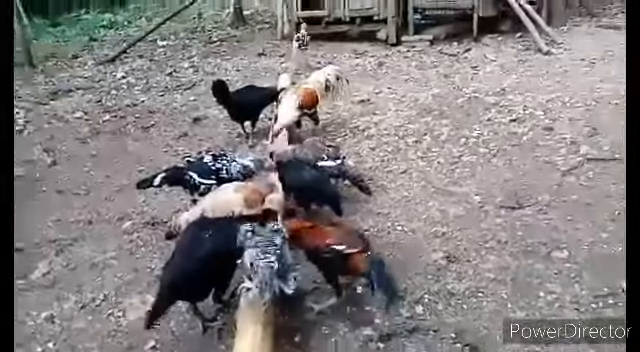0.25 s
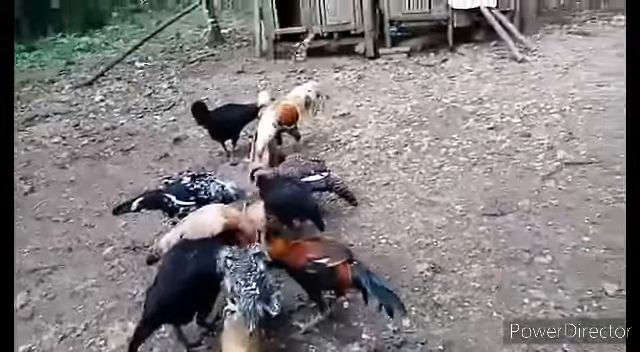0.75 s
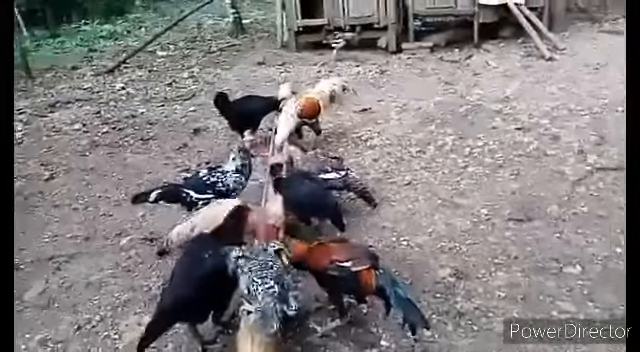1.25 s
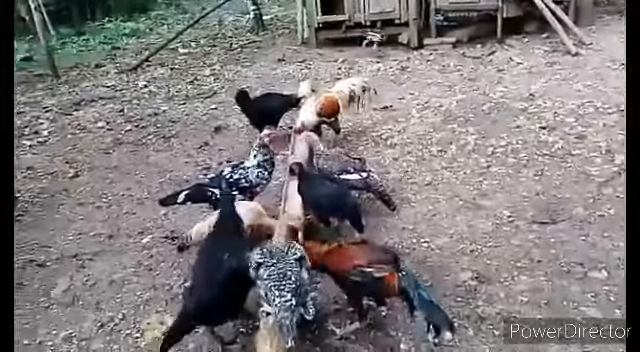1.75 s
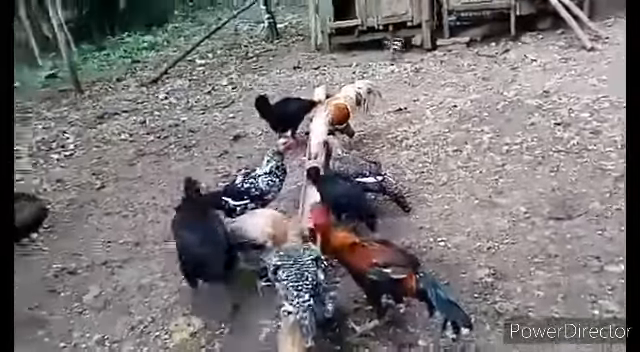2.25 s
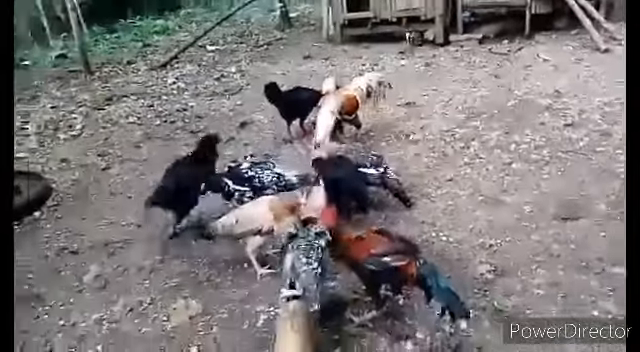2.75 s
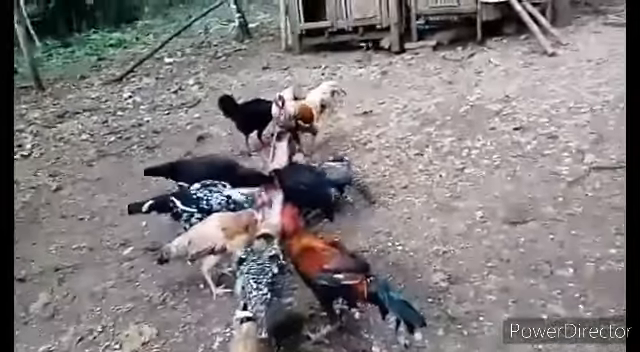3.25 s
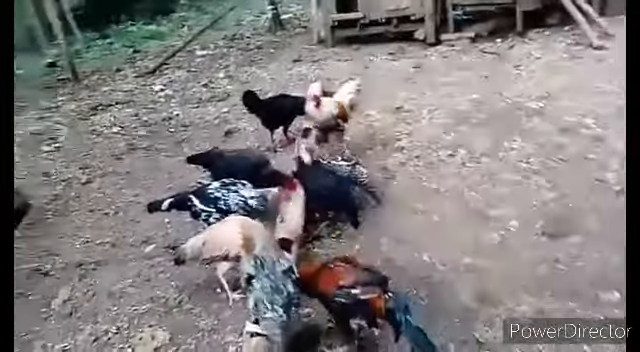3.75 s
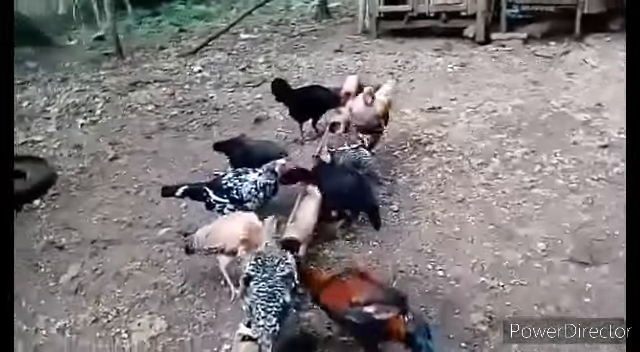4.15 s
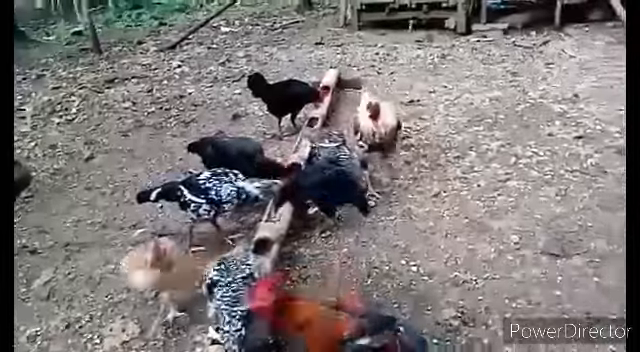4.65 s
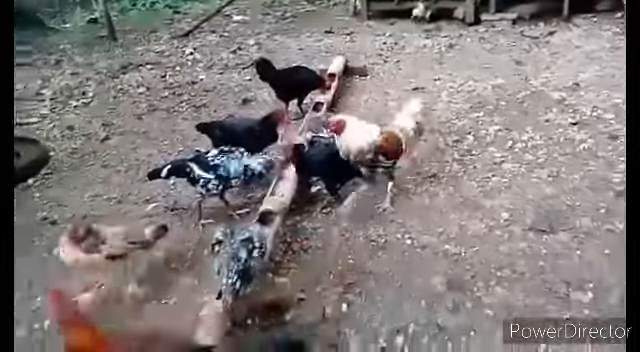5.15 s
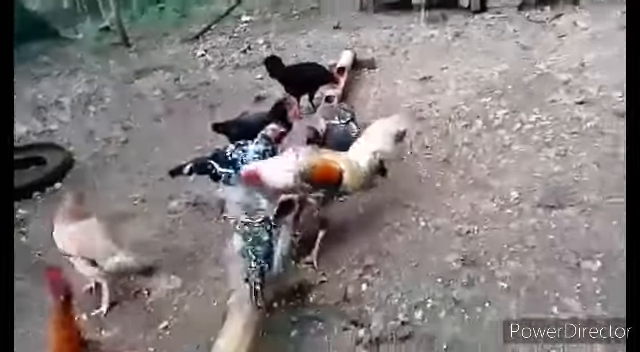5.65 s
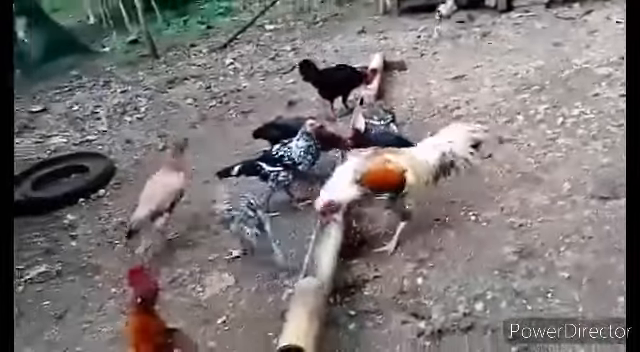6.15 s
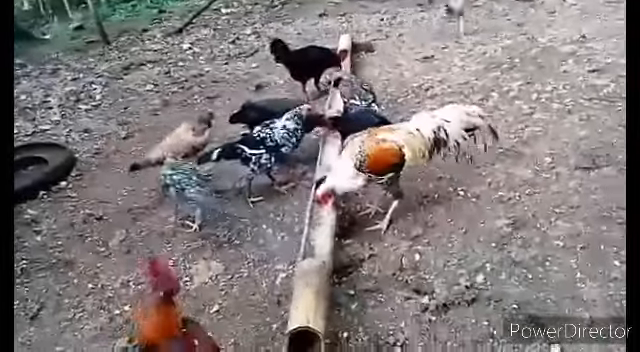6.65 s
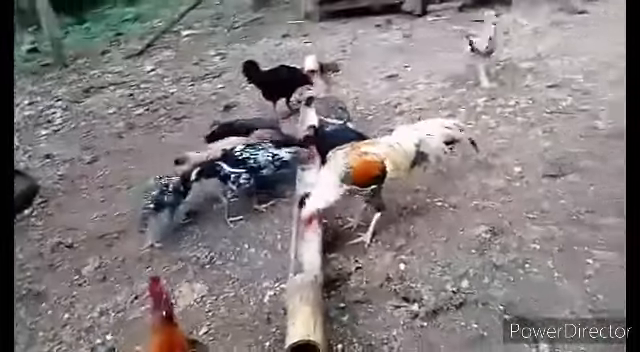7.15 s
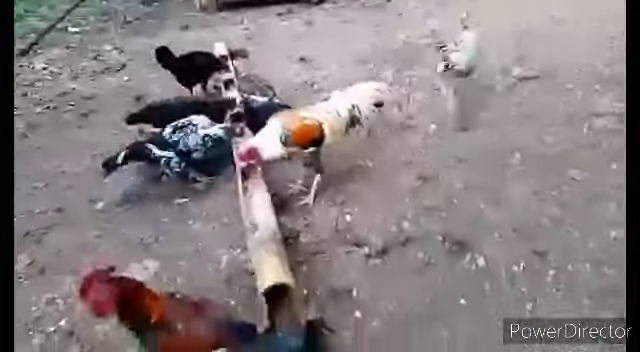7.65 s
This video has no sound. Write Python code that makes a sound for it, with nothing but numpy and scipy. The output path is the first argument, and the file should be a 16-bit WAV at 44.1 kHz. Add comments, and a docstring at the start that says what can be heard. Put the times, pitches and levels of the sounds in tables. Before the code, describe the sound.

Dry, hollow beak taps on bamboo and scattering grain in a dirt yard, soft clucks, gritty footsteps, brief squawks, and a faint distant engine hum.

```python
"""Hens peck grain from a split bamboo trough: beaks ring the bamboo's modes and scatter noisy grain.
A few birds squawk (pulses and puffs through a throat) or cluck softly (gliding notes); claws rake grain.
The place is a dirt yard: feet shuffle in grit, air and leaves wash, and far off an engine hums (noise
through low resonances) and an insect buzzes (pulsed noise through a high one).
The microphone is a hand-held phone with two ports; fingers knock the right one with dull thuds."""
import sys
import numpy as np
from scipy import signal
from scipy.fft import rfft, irfft, next_fast_len
from scipy.io import wavfile
from scipy.ndimage import uniform_filter1d

SR = 44100
rng = np.random.default_rng(int(sys.argv[2]) if len(sys.argv) > 2 else 0)


def output_pcm(signal):
    """Save a mono or channel-first signal as 16-bit PCM at the path in sys.argv[1].

    Samples are clipped to [-1, 1] before scaling.
    """
    pcm = np.clip(np.atleast_2d(signal).T, -1, 1) * 32767
    wavfile.write(sys.argv[1], SR, np.round(pcm).astype(np.int16))


def volts(x):
    """Linear amplitude factor 10**(x/20) for a level x in dB, scalar or array-like."""
    e = np.asarray(x, float) / 20
    return 10 ** e


N = 347949  # samples
# Levels of the sources are those ahead of the port gains and the filters that follow.


def evened(x):
    """Scales to rms 1."""
    return x / np.sqrt(np.mean(x ** 2) + 1e-20)


def read(points, hz):
    """Reads a spectrum on a log-frequency axis."""
    f, value = np.transpose(points)
    return np.interp(np.log(hz + 1), np.log(f + 1), value)


def coloured(x, gain):
    """Filters by a gain given as a function of Hz."""
    size = next_fast_len(len(x) + 512)
    return irfft(rfft(x, size) * gain(np.fft.rfftfreq(size, 1 / SR)), size)[:len(x)]


def add(mix, s, sound):
    """Mixes a sound in at time s."""
    part = mix[..., round(s * SR):][..., :sound.shape[-1]]
    part += sound[..., :part.shape[-1]]


def track(rows, sound):
    """Plays one sound per row, at the time that opens the row."""
    mix = np.zeros(N)
    for s, *row in rows:
        add(mix, s, sound(*row))
    return mix


def resonate(x, hz, width):
    """One resonance of gain 1 that may move."""
    turn = np.exp(2j * np.pi * np.cumsum(hz * np.ones(len(x))) / SR)
    r = np.exp(-np.pi * width / SR)
    return 2 * (turn * signal.lfilter([1 - r], [1, -r], x / turn)).real


def wander(per_s):
    """Slow chance of rms 1, whose swings fall off above per_s hertz."""
    return evened(coloured(rng.standard_normal(N), lambda hz: 1 / (1 + (hz / per_s) ** 2)))


def patchy(x, patchy_db):
    """Lets patches of the spectrum swell and fade at random."""
    z = signal.stft(x, nperseg=512, noverlap=384)[2]
    chance = rng.standard_normal(z.T.shape)
    patches = evened(uniform_filter1d(uniform_filter1d(chance, 16, 0), 8, 1)).T
    return signal.istft(z * volts(patchy_db * patches), nperseg=512, noverlap=384)[1][:N]


def insect():
    """Far insect: wing-beat bursts of noise into a high resonance."""
    hz, beats_per_s, mean_db = 11293, 200, -80
    beat = 0.52 + np.exp(2.0 * (np.cos(2 * np.pi * beats_per_s * np.arange(N) / SR) - 1))
    buzz = resonate(resonate(beat * rng.standard_normal(N), hz, 300), hz, 400)
    return volts(mean_db + 2.2 * wander(6.4)) * evened(buzz)


# Engine orders and rumble: (centre [Hz], width of the first resonance [Hz], level before the swells [dB])
ENGINE_ORDERS = [(122.33, 3, -67), (155, 10.8, -68), (184, 3.1, -72.5), (136.5, 111, -66.5),
                 (69, 17, -81.5)]
# Swells of the engine as the air carries it: (time [s], gain [dB])
ENGINE_SWELLS = [(0, -3.5), (1.2, -3), (2.2, -6.5), (3.7, -7), (5, -3), (5.9, -10), (6.4, -7), (6.8, -9),
                 (7.89, -8)]


def engine():
    """Distant engine: noise through narrow low resonances, its level wavering."""
    orders = (volts(db) * evened(resonate(resonate(rng.standard_normal(N), hz, w), hz, 2 * w))
              for hz, w, db in ENGINE_ORDERS)
    swell_db = np.interp(np.arange(N) / SR, *np.transpose(ENGINE_SWELLS))
    return sum(orders) * volts(swell_db + 2.4 * wander(8))


# Colour of the yard's air: (frequency [Hz], relative gain [dB])
YARD_COLOUR = [(180, -65), (300, -34), (435, -12), (863, -16), (2970, -1), (5710, -8), (7030, -19.5),
               (8280, -6.5), (10000, -30.5), (10500, 1.5), (12300, -41), (22000, -120)]


def yard():
    """Far wash of air and leaves: coloured noise with a patchy spectrum."""
    wash = coloured(rng.standard_normal(N), lambda f: volts(read(YARD_COLOUR, f)))
    return volts(-71.5) * evened(patchy(wash, 2.5))


# Colour of grit underfoot: (frequency [Hz], relative gain [dB])
GRIT_COLOUR = [(300, -6), (600, -0.5), (900, -0.5), (1400, -1.5), (3000, -1), (4600, -13), (5700, -6),
               (7000, -25.5), (9000, -16.5), (12500, -38)]
# How busy the flock is: (time [s], rustle level [dB])
FLOCK_BUSTLE = [(0, -64), (.5, -65), (1.03, -70.5), (1.14, -65.5), (1.3, -64), (1.75, -68.5), (2.2, -64.5),
                (2.85, -63.5), (3.4, -65), (4.35, -66.5), (5.1, -63.5), (5.3, -67.5), (5.72, -56),
                (6.1, -69), (6.7, -66), (6.8, -77.5), (6.95, -61.5), (7.3, -68.5), (7.89, -62.5)]
# Footfalls: (middle [s], length [s], low scuff level [dB], level of grit kicked up [dB])
FOOTFALLS = [(.0, 0.097, -73, -59), (0.282, 0.15, -64.5, -73), (0.781, 0.15, -62.5, -75),
             (0.958, 0.076, -55.5, -58), (1.358, 0.19, -67, -76), (2.04, 0.14, -69.5, -61.5),
             (2.343, 0.12, -60, -57.5), (2.484, 0.13, -64, -60), (2.673, 0.3, -65, -70),
             (3.426, 0.12, -65.5, -59.5), (4.773, 0.11, -59, -67), (5, 0.078, -55, -65),
             (5.142, 0.23, -64.5, -68), (6.12, 0.16, -67, -90), (6.378, 0.78, -69, -87),
             (7.04, 0.12, -73, -65.5), (7.63, 0.41, -68.5, -73)]


def shuffle():
    """Clumped grains of grit over a rustle, and lumpy low scuffs of feet."""
    time = np.arange(N) / SR
    t = np.arange(0, N + 64, 64) / SR
    s, length, scuff_db, kick_db = np.transpose(FOOTFALLS)[:, :, None]
    falls = np.exp(-(3 * (t - s) / length) ** 2)  # each footfall swells and fades
    kicked, scuffed = (np.interp(time, t, (volts(db) * falls).sum(0)) for db in (kick_db, scuff_db))
    rustle = np.hypot(volts(np.interp(time, *np.transpose(FLOCK_BUSTLE))), kicked)
    clumps, lumps = volts(3.5 * wander(35)), volts(5.5 * wander(25))
    grains = volts(1.7 * np.minimum(rng.exponential(1, N), 4))
    grains = grains * (rng.random(N) < 2500 / SR) * rng.choice([-1, 1], N)  # about 2500 a second
    grit = evened(grains) * clumps + 0.81 * rng.standard_normal(N)
    grit = coloured(grit, lambda f: volts(read(GRIT_COLOUR, f)))
    scuff = resonate(resonate(rng.standard_normal(N) * lumps, 260, 380), 460, 570)
    return evened(patchy(grit, patchy_db=4.5)) * rustle + evened(scuff) * scuffed


# How alike the diffuse sound is at the two ports: (frequency [Hz], likeness [0-1])
PORT_LIKENESS = [(100, .75), (300, .65), (1000, .85), (2500, .7), (5000, .5), (9000, .2)]


def surroundings():
    """Diffuse sound, only partly alike at the two ports."""
    right, other = (shuffle() + yard() + engine() + insect() for port in "rl")
    like = lambda f: read(PORT_LIKENESS, f)
    left = coloured(right, like) + coloured(other, lambda f: np.sqrt(1 - like(f) ** 2))
    return np.array([left, right])


def knock(db, hz, tick_db, case_hz=3700):
    """A dull thud whose pitch sags to hz, led by a tick of the phone case."""
    t = np.arange(round(.06 * SR)) / SR
    softer = volts(-0.38 * db)  # below 0 dB a knock rises and dies slower
    t60, rise = 0.005 * softer, 0.00017 * softer  # seconds
    thud = -np.cos(2 * np.pi * hz * (t + 0.00055 * (1 - np.exp(-t / 0.00055)))) * volts(-60 * t / t60)
    slump = 0.13 * np.sin(2 * np.pi * 60 * t + np.pi) * volts(-60 * t / 0.018)  # the membrane settles
    tick = -np.cos(2 * np.pi * case_hz * (t - .00025)) * volts(tick_db - 60 * abs(t - .00025) / 0.001)
    return volts(db) * (thud + slump + tick) * (1 - np.exp(-(t / rise) ** 2))


# Finger knocks on the right port: (time [s], level [dB], thud pitch [Hz], tick against thud [dB])
PORT_KNOCKS = [(.788, -47, 467, -20), (.822, -47, 260, -25), (1.0127, -24.5, 155, -12),
               (1.215, -22, 380, -40), (1.315, -49, 525, -15), (1.69, -7.5, 308, 0),
               (2.565, -43.5, 316, -10), (4.599, -44, 245, -10), (5.751, -45, 190, -6),
               (6.071, -45.5, 294, -22), (6.361, -43, 328, -15), (7.448, -42.5, 303, -14)]


def knocking():
    """Fingers of the hand that holds the phone, right on the microphone: one thud per row."""
    return track(PORT_KNOCKS, knock)


def scrape(length, db, hz, width):
    """A burst of grainy rustle in one broad band."""
    count = round(length * SR)
    clusters = evened(uniform_filter1d(rng.standard_normal(count), 70))
    grains = rng.standard_normal(count) * volts(3 * clusters)
    rustle = evened(resonate(resonate(grains, hz, width), hz, width))
    return volts(db) * rustle * np.sin(np.pi * np.linspace(0, 1, count) ** .5)


# Claw scrapes: (time [s], length [s], level before the fades [dB], centre [Hz], width of each resonance [Hz])
CLAW_SCRAPES = [(0.99, 0.13, -56.5, 2520, 1770), (2.698, 0.076, -58.5, 4960, 6000),
                (2.70, 0.091, -56.5, 1370, 1310), (5.051, 0.2, -64.5, 3000, 3000),
                (7.636, 0.06, -61, 1850, 2400)]


def scraping():
    """Claws rake loose grain: one rustling burst per row."""
    return track(CLAW_SCRAPES, scrape)


def cluck(length, db, from_hz, to_hz):
    """A muffled, husky gliding note with a weak overtone."""
    u = np.linspace(0, 1, round(length * SR))
    waver, husk = uniform_filter1d(rng.standard_normal((2, len(u))), 150) * np.sqrt(150)
    turns = np.cumsum((from_hz + (to_hz - from_hz) * u) * (1 + .022 * waver)) / SR
    note = np.sin(2 * np.pi * turns) + .14 * np.sin(4 * np.pi * turns)
    return volts(db) * note * (1 + .35 * husk) * np.sqrt(abs(np.sin(np.pi * u)))


# Soft clucks and chirps: (time [s], length [s], level [dB], start pitch [Hz], end pitch [Hz])
SOFT_CLUCKS = [(0.874, 0.058, -70, 1840, 1800), (1.378, 0.075, -61, 1082, 1080),
               (1.791, 0.052, -62, 475, 512), (2.006, 0.043, -63, 564, 613), (2.461, 0.044, -62, 557, 500),
               (3.072, 0.039, -60, 593, 550), (3.207, 0.13, -70, 690, 720), (3.355, 0.051, -59, 426, 494),
               (3.523, 0.033, -61, 473, 576), (3.648, 0.032, -61, 551, 472), (3.789, 0.052, -57, 279, 456),
               (4.308, 0.032, -63.5, 530, 510), (4.961, 0.038, -58.5, 398, 435),
               (5.324, 0.04, -58, 1575, 1550), (6.059, 0.053, -69, 720, 760),
               (7.668, 0.04, -46, 1274, 1607), (7.673, 0.048, -46.5, 1172, 1023)]


def clucking():
    """Birds murmur with near-closed voices: one gliding note per row."""
    return track(SOFT_CLUCKS, cluck)


# Throat resonances: (centre before the beak moves it [Hz], width of the first pass [Hz],
# level at full effort [dB], gain per dB that effort falls [dB])
THROAT_MODES = [(620, 250, -25, .3), (1230, 380, -1, .2), (1900, 330, 1, -.5), (2410, 350, -11, .8),
                (3080, 300, 2, -.6), (3750, 350, -9, 0), (4800, 1600, -17, -1.5)]


def squawk(rows, loss_db, small):
    """Jittered, uneven pulses and puffs of noise through a throat that moves with the beak."""
    s, *columns = np.transpose(rows)
    t = np.arange(s[0], s[-1], 1 / SR)
    effort_db, hz = (np.interp(t, s, c) for c in columns)
    slack_db = -26 - effort_db  # dB below full effort
    rough = np.clip(.19 + .01 * slack_db, 0, 1)  # the voice frays as effort falls
    beak = small * np.maximum(1.025 - .0035 * slack_db, .8)  # opens with effort, scaling the throat's pitch
    eased_db = np.clip(slack_db, 0, 14)
    jitter = .28 * uniform_filter1d(rng.standard_normal(len(t)), 250)
    turns = np.cumsum(hz * (1 + jitter)) / SR
    pulse_chance = rng.standard_normal(int(turns[-1]) + 2)[np.round(turns).astype(int)]
    uneven = volts(5 * rough * pulse_chance)
    uneven *= 1 + .2 * np.cos(np.pi * turns)  # every other pulse is weaker
    folds = uneven * sum(np.cos(2 * np.pi * k * turns + k * k / 2) for k in range(1, 12))
    bright_noise = np.diff(rng.standard_normal(len(t) + 1))
    puffs = (0.053 + np.exp(-(turns % 1) / 0.051)) * bright_noise
    drive = (1 - rough) * evened(folds) + 2.8 * rough * evened(puffs)
    # each resonance stutters by itself
    breaks_db = 4 * evened(uniform_filter1d(rng.standard_normal((len(THROAT_MODES), len(t))), 350))
    voice = np.zeros(len(t))
    for k, (f, w, db, per_db) in enumerate(THROAT_MODES):
        mode = resonate(resonate(drive, f * beak, w), f * beak, 2 * w)
        voice += (-1) ** k * volts(db + per_db * eased_db + breaks_db[k]) * mode
    # the windpipe passes little bass or treble
    voice = coloured(voice, lambda f: 1 / (1 + (f / 6800) ** 6) / (1 + (480 / (f + 1)) ** 6))
    even = voice / np.sqrt(uniform_filter1d(voice ** 2, 500) + 1e-9)
    return s[0], volts(effort_db + loss_db) * even * signal.windows.tukey(len(t), .08)


# One list a squawk, each of rows (time [s], effort as level before distance [dB], pitch before jitter [Hz])
SQUAWK_CURVES = [
    [(5.553, -54, 450), (5.568, -39, 570), (5.59, -35.5, 622), (5.62, -28, 626), (5.63, -32, 625),
     (5.639, -28, 630), (5.67, -38, 590), (5.695, -53, 490), (5.73, -61, 485)],
    [(5.832, -51, 415), (5.85, -40, 545), (5.868, -34, 600), (5.896, -40, 645), (5.915, -43, 550),
     (5.935, -68, 490)],
    [(7.77, -40, 1040), (7.82, -27, 1058), (7.889, -25, 1062)],
]
# The bird of each squawk: (loss with distance [dB], throat pitch [factor]); the last is a far, small bird
SQUAWK_BIRDS = [(-1, 1.0), (-1, 0.97), (-30, 1.54)]


def squawking():
    """Birds cry out, each voice lowered by its distance."""
    birds = np.zeros(N)
    for rows, bird in zip(SQUAWK_CURVES, SQUAWK_BIRDS):
        add(birds, *squawk(rows, *bird))
    return birds


# Bamboo modes: (frequency before detuning [Hz], relative level [dB], 60 dB decay before damping by grain [s])
BAMBOO_MODES = [(790, -5, .022), (940, -1, .023), (1060, -1, .022), (1400, -2, .02), (1620, -2, .018),
                (1900, -1, .022), (2150, -3, .018), (2450, -2, .018), (2800, -2, .018), (3300, -2, .018),
                (3720, -2, .018), (4250, -4, .015), (4750, -4, .015), (5300, -8, .012), (6100, -14, .01),
                (7600, -23, .01), (9200, -29, .008)]
# Colour of the crack and the scattered grain: (frequency [Hz], relative gain [dB])
GRAIN_COLOUR = [(450, -1.5), (800, 1.5), (1100, -3.5), (3200, 0.5), (5000, -6), (7000, -20), (9000, -24.5),
                (12500, -45)]


def peck(db, spot_hz, sharp_db, grain_db):
    """A beak cracks on the wall and rings the modes near its spot; grain rattles after it."""
    t = np.arange(round(.14 * SR)) / SR
    hz, mode_db, ring = np.transpose(BAMBOO_MODES)[:, :, None]
    chance = rng.standard_normal((3, len(BAMBOO_MODES), 1))  # for level, tuning and phase
    near_db = lambda f: 9 * np.exp(-.5 * (np.log2((f + 1) / spot_hz) / 0.43) ** 2)  # 0.43 octaves wide
    # a harder beak drives the treble
    tilt_db = lambda f: (sharp_db + 14.0) * np.clip(np.log2((f + 1) / 1500), 0, 1.3)
    detuned = hz * (1 + .06 * chance[1])  # wall thickness and grain load differ along the trough
    damped = .95 * ring  # grain lying in the trough shortens the ring
    level = volts(mode_db + near_db(hz) + tilt_db(hz) + 2.5 * chance[0] - 60 * t / damped)
    blow = (level * np.sin(2 * np.pi * (detuned * t + 0.28 * chance[2]))).sum(0)
    crack_gain = lambda f: volts(read(GRAIN_COLOUR, f) + near_db(f) + tilt_db(f))
    crack = coloured(rng.standard_normal(len(t)), crack_gain)
    blow = blow / abs(blow).max() + volts(2 - 60 * t / 0.0071) * evened(crack)
    blow *= 1 - np.exp(-(t / .0016) ** 2)  # the beak sinks through grain first
    kernels = rng.standard_normal(len(t))
    clusters = evened(uniform_filter1d(rng.standard_normal(len(t)), 45))  # kernels land in clusters
    mode_chance_db = lambda f: 3 * np.interp(f, hz[:, 0], chance[0, :, 0])
    rattle_gain = lambda f: volts(read(GRAIN_COLOUR, f) + tilt_db(f) + near_db(f) / 2 + mode_chance_db(f))
    rattle = evened(coloured(kernels * volts(5 * clusters), rattle_gain))
    rattle *= volts(grain_db - 60 * (t / 0.062) ** 1.08)  # down 60 dB in 62 ms
    rattle *= 1 - np.exp(-(t / .003) ** 2)
    # the open trough radiates little bass
    return volts(db) * coloured(blow / abs(blow).max() + rattle, lambda f: 1 / (1 + (700 / (f + 1)) ** 6))


# Pecks: (time [s], blow level before the bass cut [dB], pitch favoured by the spot struck [Hz],
# sharpness of the beak [dB], scattered grain against the blow [dB])
TROUGH_PECKS = [(0.081, -23, 3330, -13.5, -14), (0.242, -37.5, 1680, -7.5, 2),
                (0.279, -38, 1050, -16.5, -9.5), (0.367, -39, 1070, -18.5, -7.5),
                (0.402, -29, 1370, -10, -14.5), (0.526, -35, 1160, -17.5, -7), (0.576, -35, 980, -18.5, -5),
                (0.69, -43, 1050, -19.5, -7), (0.748, -34.5, 1170, -17, -4), (0.763, -28, 2100, -15, -22),
                (0.81, -43, 1190, -9.5, -15), (0.941, -27, 2380, -13, -17), (0.957, -43, 1330, -33, -13),
                (0.983, -26.5, 2780, -14.5, -18), (1.009, -31, 2370, -15, -17),
                (1.105, -31.5, 1440, -11, -16), (1.115, -44, 2590, 6, -7), (1.185, -37, 1940, -18, -27),
                (1.406, -42.5, 3170, -16, -6.5), (1.528, -37.5, 2180, -13, -2), (2.05, -50.5, 1970, -5, -1),
                (2.331, -50.5, 1940, 0, -2.5), (2.346, -38.5, 1900, -18, -6.5), (2.556, -48, 940, -13, 0.5),
                (2.636, -26, 1380, -15, -15), (2.695, -28, 1480, -21, -23), (2.807, -29, 1050, -15, -17),
                (2.923, -37.5, 900, -17.5, -38), (2.955, -48.5, 1920, -21, -8.5),
                (2.991, -35.5, 960, -16.5, -8), (3.152, -47.5, 790, -46, -4), (3.197, -35, 1630, -9, -9),
                (3.351, -41.5, 766, -22.5, -6), (3.64, -46.5, 937, -16, -4), (3.761, -44.5, 2720, -6, -6.5),
                (3.845, -35.5, 1270, -13, -43), (3.873, -40, 1480, -32, -29),
                (3.914, -36.5, 804, -17.5, -3.5), (4.023, -34, 2130, -26, -28),
                (4.076, -32, 970, -19, -8.5), (4.258, -34.5, 860, -16.5, -9),
                (4.441, -33.5, 1820, -20, -11), (4.478, -44, 1800, -12, -25), (4.556, -40.5, 770, -27, -14),
                (4.604, -27.5, 1900, -15, -22), (4.618, -35, 860, -19, -11), (4.65, -45, 3080, -7, -8),
                (4.752, -43, 1300, -20, -10), (4.806, -43, 1500, -16.5, -1), (4.873, -26.5, 1430, -14, -40),
                (4.939, -50, 3540, -12, -4.5), (5.034, -48, 2700, -10, -4.5),
                (5.054, -43.5, 3500, -14, -29), (5.072, -35.5, 1160, -15, -5.5),
                (5.12, -42, 3630, -17.5, -0.5), (5.173, -43.5, 840, -16, -10),
                (5.258, -28, 1260, -3.5, -26), (5.27, -44, 2000, -28, -29), (5.414, -46.5, 2000, -10, -5),
                (5.461, -24.5, 1870, -13.5, -33), (5.505, -43, 834, -42, -2.5), (5.78, -45, 4200, -10, -24),
                (5.823, -42, 5500, -4, -12), (6.058, -50, 910, -23, -3), (6.317, -46.5, 1030, -18, -12),
                (6.354, -48, 2520, -21, -25), (6.378, -44.5, 940, -21, 0.5), (6.492, -53, 726, -23.5, 7),
                (6.627, -50, 1030, -21.5, 3), (6.941, -43, 890, -25.5, -1.5), (6.966, -46, 1360, -29, -7),
                (7.132, -42.5, 940, -21.5, 0), (7.149, -40, 980, -15, -21),
                (7.334, -41.5, 915, -22.5, -3.5), (7.435, -46.5, 790, -32, -4),
                (7.525, -39.5, 890, -18, -5), (7.630, -33, 3380, -17.5, -8), (7.737, -46, 5400, -10, -10)]


def pecking():
    """Beaks strike the trough row by row, with faint pecks of farther birds at random moments."""
    birds = track(TROUGH_PECKS, peck)
    for when, size, spot in rng.random((14, 3)):
        stray_db = -53 + 3 * (2 * size - 1)
        add(birds, when * N / SR, peck(stray_db, 800 * 4 ** spot ** 2, -15, -12))
    return birds


def echoes(x, echo_db):
    """Short scatter from ground, birds and coop."""
    t = np.arange(round(.2 * SR)) / SR
    fade = volts(-60 * t / .13) * (t > .004)
    taps = rng.choice([-1., 1.], len(t)) * (rng.random(len(t)) < .05) * fade
    return x + volts(echo_db) * signal.oaconvolve(x, taps / np.linalg.norm(taps))[:N]


# Left port against the right: (frequency [Hz], gain [dB])
LEFT_PORT_COLOUR = [(100, -5), (600, -8), (1200, -10.5), (2200, -15.5), (3800, -18), (6900, 1),
                    (12000, -6.5)]


def ports(left, right):
    """The left port hears 46 samples earlier and is weakest near 4 kHz; both gain 6 dB."""
    left = coloured(left, lambda f: volts(read(LEFT_PORT_COLOUR, f)))
    return volts(6.0) * np.array([np.roll(left, -46), right])


def scene():
    """Birds at the trough, the yard around them and the hand on the phone."""
    birds = pecking() + squawking() + clucking() + scraping()
    hand = knocking() * volts([[-30], [6]])  # left and right port, dB
    # the shadowed left port gets more scatter
    near = np.array([echoes(birds, echo_db=-1), echoes(birds, echo_db=-15)])
    return ports(*(near + surroundings())) + hand


def band_limit(x):
    """A steep low-pass at the top of the band."""
    return signal.sosfilt(signal.butter(12, 12300, fs=SR, output="sos"), x)


def record(dry):
    """The phone's microphones drop the deepest bass, below 62.4 Hz."""
    low_cut = signal.butter(2, 62.4, "high", fs=SR, output="sos")
    mix = signal.sosfilt(low_cut, dry)
    return band_limit(mix)


dry = scene()
out = record(dry)
output_pcm(out)
```